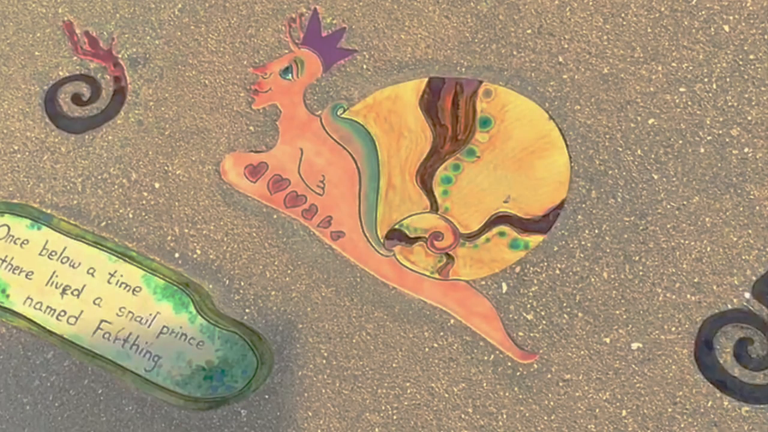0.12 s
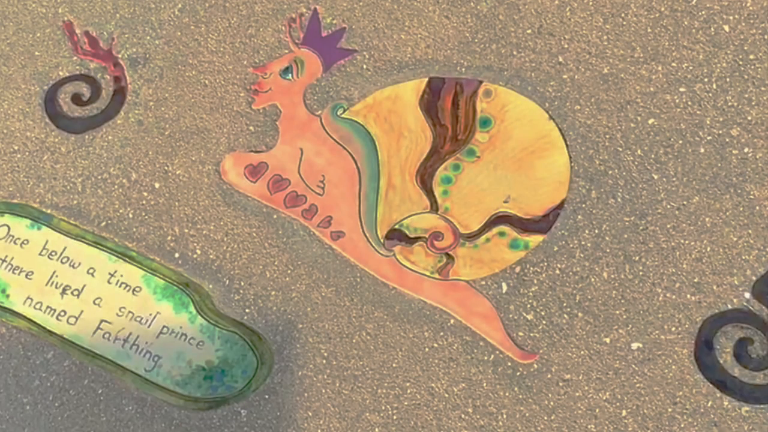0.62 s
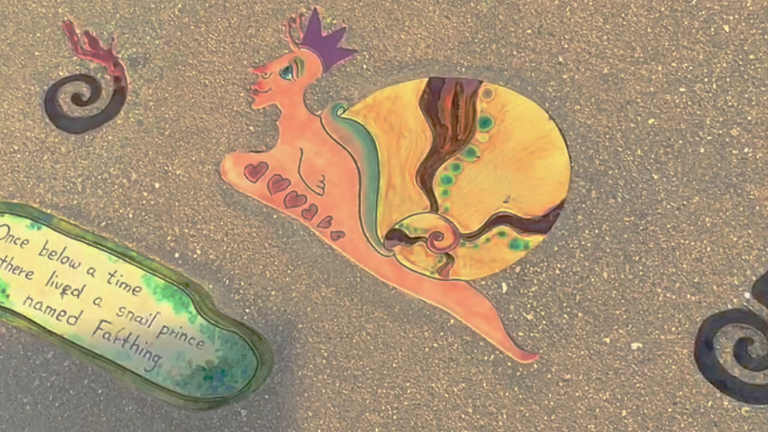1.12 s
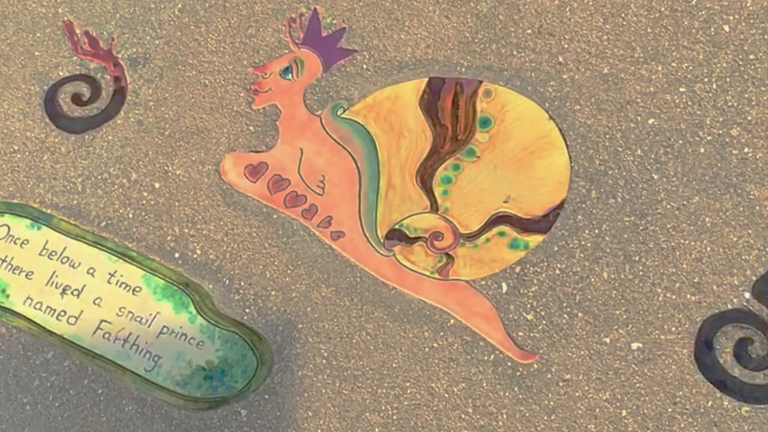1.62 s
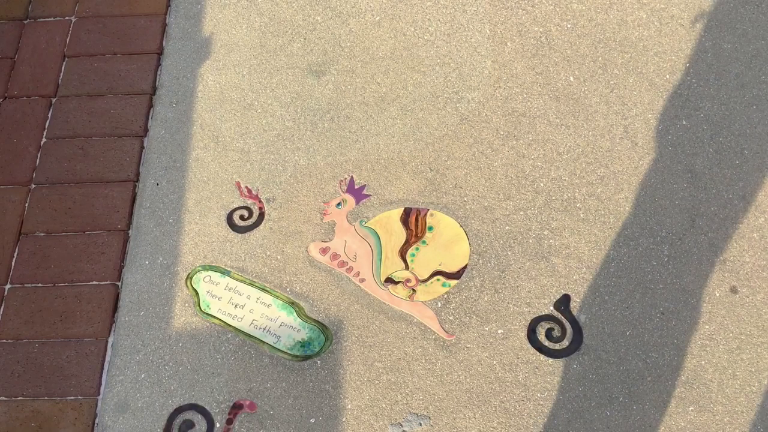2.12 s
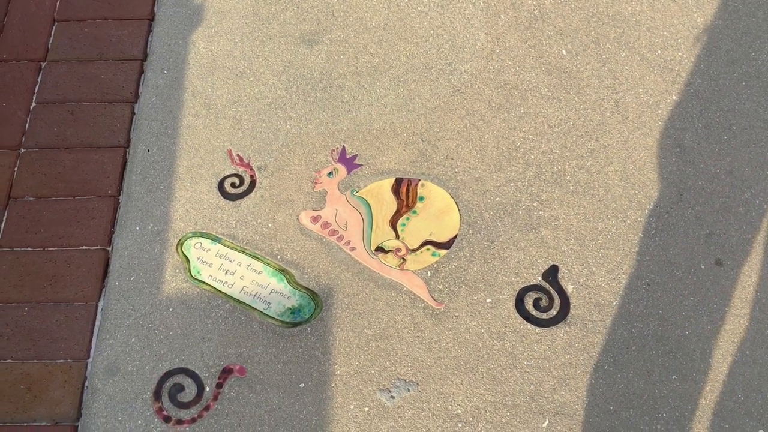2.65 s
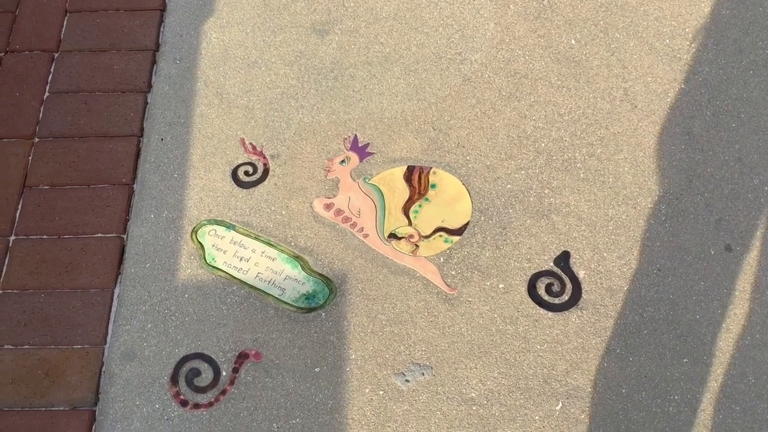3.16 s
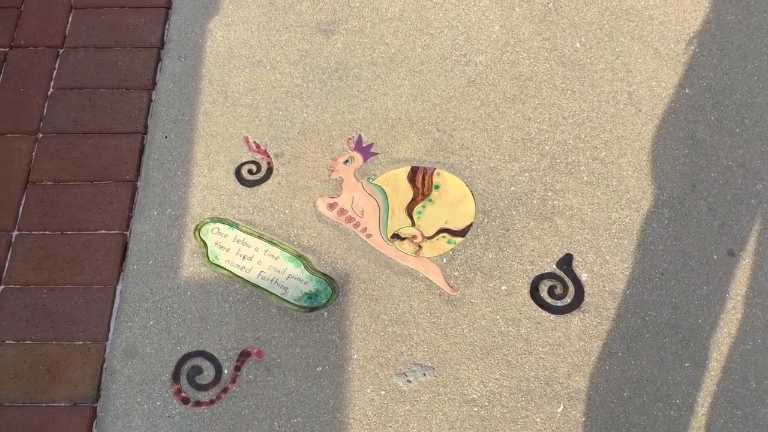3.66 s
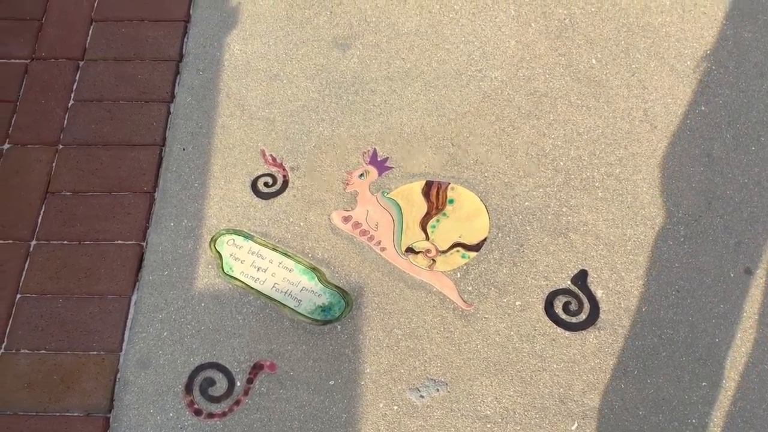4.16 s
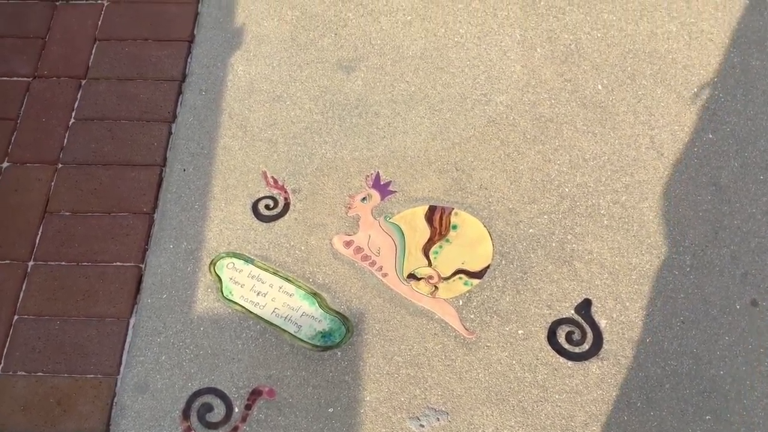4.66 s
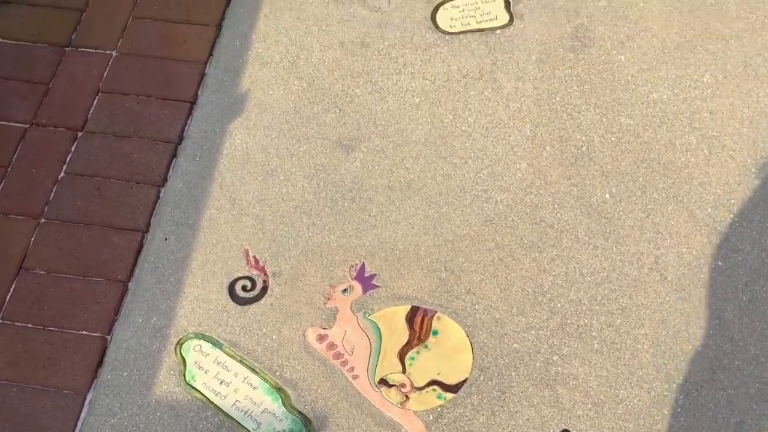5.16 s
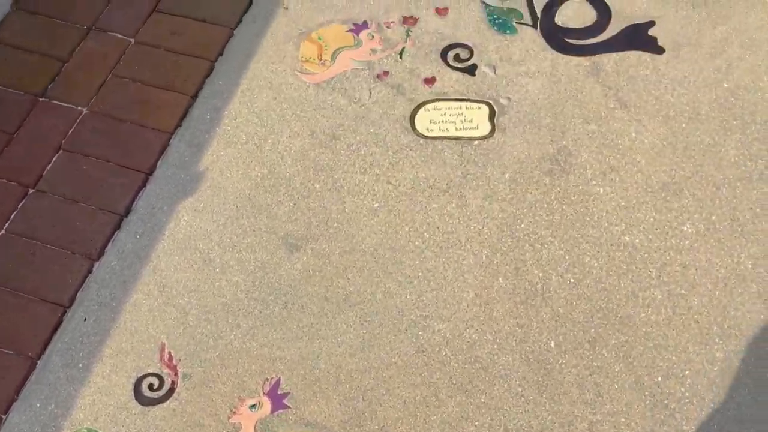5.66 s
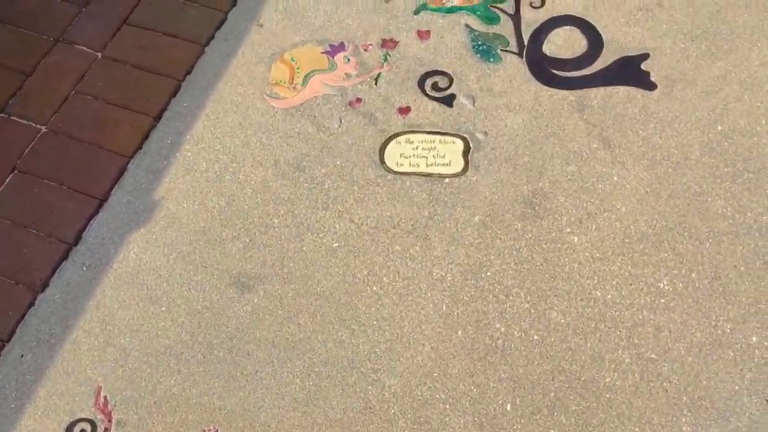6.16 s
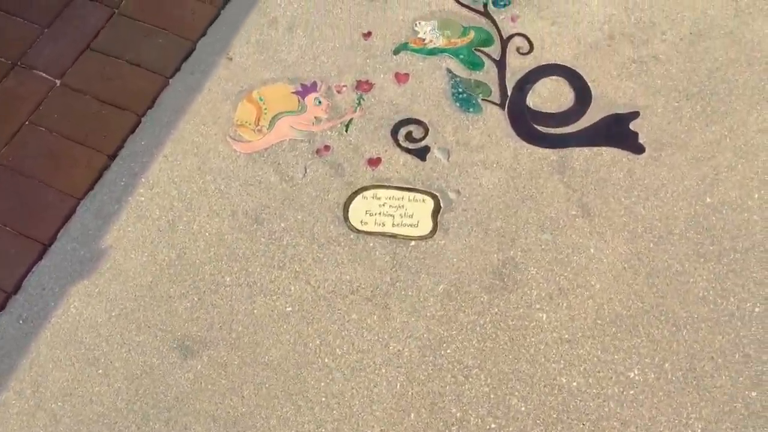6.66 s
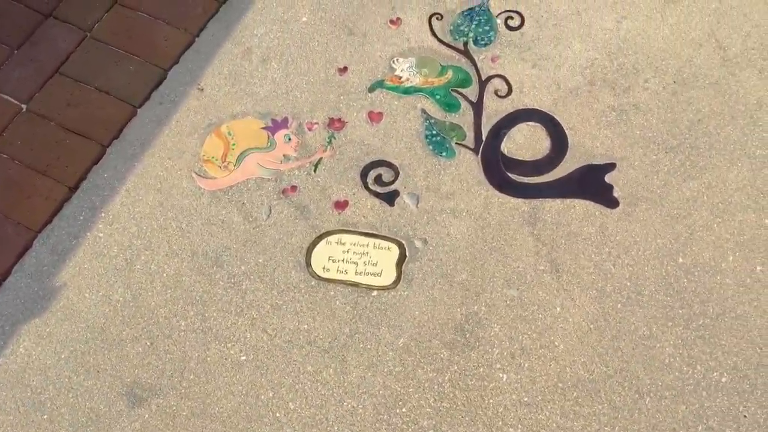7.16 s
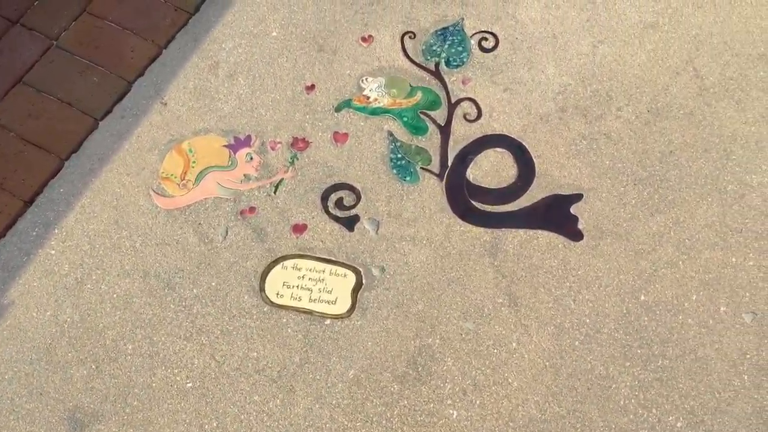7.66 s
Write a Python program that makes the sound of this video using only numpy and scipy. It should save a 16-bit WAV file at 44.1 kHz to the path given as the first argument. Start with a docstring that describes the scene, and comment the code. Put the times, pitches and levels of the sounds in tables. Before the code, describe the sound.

A large fountain, some way off across a paved city square, fills all 7.8 seconds with a dense, even rush: churning midrange water and bright, hissing spray full of tiny drops and bubbles. Pavement echo gives it a slightly hollow colour that shifts as the handheld microphone moves. Distant traffic rumbles softly underneath, wavering. A clear splash lands at 0.9, with gurgling plops around 0.5 to 1.2, and a soft low bump at 1.4. More bubbling comes near 1.9. At about 2.07 the sound fades very quickly to complete silence, then snaps back at 2.23. Dull handling knocks follow at 2.5 and 2.75 amid small splashes. Between 4.1 and 4.26 there are sharp, dry-edged slaps, splashes and two small knocks. The flow continues steadily, with plops around 6 to 6.3 and a busier run of splashes from 6.9 to 7.5, running on to the end.

```python
"""A dense, steady rush of falling water: a large fountain some way off across a paved square.
Banded noise, drop ticks and bubble rings form the rush; noise bursts, slaps and plops stand out on top.
The pavement's echo combs the rush, shifting as the microphone moves; soft knocks are decaying low sines.
City traffic, low filtered noise, rumbles below. The sound fades to silence once and snaps back."""
import sys
import numpy as np
from scipy import signal
from scipy.fft import rfft, irfft
from scipy.io import wavfile
from scipy.ndimage import uniform_filter1d, map_coordinates

SR = 44100
rng = np.random.default_rng(int(sys.argv[2]) if len(sys.argv) > 2 else 0)


def unload_audio(sound):
    """Save the sound as a 16-bit wav file, at the path given as the first command line argument."""
    columns = np.transpose(np.atleast_2d(sound))
    # keep every value between -1 and 1, then stretch to whole-number steps
    steps = np.round(np.clip(columns, -1, 1) * 32767)
    wavfile.write(sys.argv[1], SR, steps.astype(np.int16))


def attenuation_scalar(level_db):
    """Turn a level in dB into a linear amplitude multiplier (20 dB per decade)."""
    decades = np.asarray(level_db, float) / 20
    return 10 ** decades


N = 343539  # samples

# slow drift of the flow, before surges: t/s, churn base level/dB, spray base level/dB
FLOW_DRIFT = [(0, -44.5, -43.5), (.5, -45.5, -42.5), (.9, -42, -43), (1.25, -45, -44), (1.5, -44.5, -43),
              (1.9, -44.5, -43.2), (2.3, -44.5, -43.8), (2.8, -43.5, -44.5), (3.3, -44, -44),
              (3.7, -43, -45), (4.2, -44, -43.5), (4.7, -46.5, -44.5), (5.5, -44, -43.5), (6.2, -45.5, -44),
              (7.0, -45.5, -43), (7.79, -45, -43.4)]
# churn colour: f/Hz, gain/dB
CHURN_COLOUR = [(150, -31.5), (400, -9.5), (650, 0), (1000, -1.5), (1600, 0.5), (2200, -6), (3500, -14),
                (6000, -31.5)]
# spray colour: f/Hz, gain/dB
SPRAY_COLOUR = [(800, -24), (1600, -10.5), (2500, 1.5), (4300, -3), (6000, -4.5), (9000, -8.5),
                (12000, -14), (15700, -18.5)]
# pavement echo and upper band: t/s, first echo crest f/Hz, bass echo strength/1, upper band f/Hz, its gain/dB
PAVEMENT_COMB = [(0.0, 1290, 0.7, 1920, 3.5), (0.37, 1275, 0.3, 1810, 10), (0.53, 917, 0, 2040, 4.5),
                 (0.93, 1110, 0.1, 1850, -2.5), (1.25, 906, 0.1, 2060, -0.5), (1.45, 1260, 0, 1910, 1.5),
                 (1.9, 1206, 0.3, 1930, 4.5), (2.27, 1060, 0.3, 1940, 3.5), (2.6, 1143, 0.4, 2000, 2.2),
                 (3.5, 1132, 0.45, 2030, 1.5), (4.3, 1155, 0.18, 2000, 1), (5.19, 1194, 0.38, 2070, 3.5),
                 (5.61, 984, 0.56, 1810, 3), (6.0, 930, 0.06, 1840, 2.5), (6.6, 997, 0.9, 2000, 1),
                 (7.0, 970, 0.4, 2050, 4.5), (7.45, 1096, 0.7, 2090, 3.2), (7.79, 1015, 0.6, 2050, 5)]
# loudest splashes: t/s, nominal peak level/dB, centre f/Hz
LOUD_SPLASHES = [(0.465, -30, 4800), (0.918, -22, 1460), (1.871, -29, 2580), (2.394, -32, 5300),
                 (2.546, -28, 2800), (2.747, -28.5, 3400), (2.802, -29, 2800), (3.405, -33, 5200),
                 (3.707, -31, 6170), (4.165, -27, 4960), (4.195, -26, 800), (4.26, -26, 2900),
                 (4.923, -33, 3600), (6.276, -33, 7360), (6.491, -30, 1900), (6.882, -28, 3800),
                 (6.976, -29, 2300), (7.126, -33, 4300), (7.244, -27.5, 2210), (7.315, -25, 3100),
                 (7.492, -27, 3400)]
# sharp flat slaps: t/s, onset level/dB, f/Hz, t60/s
FLAT_SLAPS = [(4.0965, -18, 4500, 0.001), (4.170, -22, 4800, .002), (4.1708, -24, 4200, .002),
              (4.243, -21.5, 1300, 0.0074)]
# loudest large bubbles: t/s, peak level/dB, onset f/Hz
LARGE_BUBBLES = [(0.493, -39, 764), (0.541, -37.5, 850), (0.915, -43, 1260), (0.921, -33.5, 850),
                 (0.989, -36, 1120), (1.07, -40, 940), (1.182, -39, 660), (1.725, -37, 1505),
                 (1.826, -41, 1186), (1.892, -34, 1400), (3.074, -38, 1190), (3.169, -37, 1065),
                 (4.119, -35, 1080), (5.955, -37.5, 798), (6.18, -38, 970), (6.325, -38, 940),
                 (6.898, -37, 936), (7.035, -34, 944), (7.645, -37, 920)]
# gurgle strength over its base level: t/s, level/dB
GURGLE_DRIFT = [(0, 5), (.4, 0.5), (.6, -6), (.93, 2), (1.0, 4), (1.2, 0), (1.7, 0.5), (1.9, 6.5),
                (2.3, -1.5), (4.3, 0.5), (4.8, -1), (6.0, -1), (6.3, 0.5), (7.79, -1)]
# knocks on the microphone body: t/s, onset level/dB, f/Hz, t60/s
BODY_KNOCKS = [(1.374, -24.5, 110, 0.047), (2.484, -26, 70, 0.075), (2.745, -27.5, 75, 0.091),
               (2.772, -27.5, 93, 0.18), (4.196, -30, 278, 0.038), (4.2475, -24.5, 224, 0.017)]
# engine swell, before the random wavering: t/s, level/dB
ENGINE_SWELL = [(0, -44.5), (.35, -47.5), (.62, -43), (1.0, -45), (2.0, -47), (2.35, -43.5), (2.75, -44.5),
                (3.05, -46.5), (3.6, -44.5), (4.6, -43.5), (5.3, -44.5), (5.55, -46), (5.8, -43.5),
                (6.1, -45), (6.55, -42.5), (7.3, -44.5), (7.79, -42)]
# engine colour: f/Hz, gain/dB
ENGINE_COLOUR = [(20, -48), (30, -31), (40, -15), (58, 3), (72, 0), (100, -8.5), (130, -8.5), (200, -34.5),
                 (400, -75.5)]
# tyre colour: f/Hz, gain/dB
TYRE_COLOUR = [(60, -34), (110, -6), (140, -2.5), (220, -5.5), (320, -6.5), (450, -14), (700, -20),
               (1500, -64)]
# microphone housing dips: centre f/Hz, Gaussian width/Hz, gain/dB
HOUSING_DIPS = [(2900, 250, -2.5), (4890, 140, -3), (7700, 430, -2.5), (10400, 310, -4)]
# fade to silence and return: t/s, gain/dB
MUTE_GAIN = [(2.055, 0), (2.062, -6), (2.068, -22), (2.076, -45), (2.093, -56), (2.095, -120),
             (2.2335, -120), (2.2345, 0)]


def fountain():
    """Jets churn the pool into bubbles and break into spray; both surge together, each heaves alone."""
    heave_db, heave_knots_per_s = -0.11, 6.3
    churn_db, spray_db = curves(FLOW_DRIFT, np.arange(N) / SR)
    surge = wobble(12) + 0.98 * wobble(25)
    churn_db = churn_db + heave_db * wobble(heave_knots_per_s) + 0.56 * surge
    spray_db = spray_db + heave_db * wobble(heave_knots_per_s) + 0.3 * surge
    landing = sheets(count=70, spread_db=3.5, life_s=0.012)
    rush = attenuation_scalar(churn_db) * churn() + attenuation_scalar(spray_db) * landing * spray()
    large_bubbles = np.vstack([LARGE_BUBBLES, gurgle(count=500)])
    return rush + splashes(count=40) + plops(large_bubbles, life_s=0.0038)


def churn():
    """Churned pool: patchy noise plus bubbles, coloured and combed, rms 1."""
    x = patchy(depth_db=2.3)
    x = x + attenuation_scalar(-10.5) * bubbles(count=9000, mid_hz=1400, octaves=0.692, cycles=7.1, spread_db=1.5)
    return unit(shaped(x, lambda hz, t: attenuation_scalar(along(CHURN_COLOUR, hz)) * pavement(hz, t)))


def spray():
    """Falling spray: patchy noise, drop ticks and small bubbles, coloured and combed, rms 1."""
    x = patchy(depth_db=2.0)
    x = x + attenuation_scalar(-3) * drops(count=5000, spread_db=3.0, life_s=0.0021)
    x = x + attenuation_scalar(-10.5) * bubbles(count=5000, mid_hz=5503, octaves=0.8, cycles=47, spread_db=1.6)
    return unit(shaped(x, lambda hz, t: attenuation_scalar(along(SPRAY_COLOUR, hz)) * pavement(hz, t)))


def sheets(count, spread_db, life_s):
    """Spray gain: sheets of water land at random, each a quick broad rise that fades."""
    s, size = rng.random((count, 2)).T
    age = np.arange(4096) / SR / life_s
    swell = (1 - np.exp(-6 * age)) * np.exp(-age)
    rise_db = spread_db * (0.5 + size[:, None]) * swell
    return attenuation_scalar(scatter(s * N / SR, rise_db))


def drops(count, spread_db, life_s):
    """Drop impacts: broad noise ticks with a sharp start, some larger than the rest, rms 1."""
    s, size = rng.random((count, 2)).T
    t = np.arange(256) / SR
    tick = rng.standard_normal((count, len(t))) * np.exp(-t / life_s)
    level_db = -spread_db * np.log(1.004 - size)
    return unit(scatter(s * N / SR, tick * attenuation_scalar(level_db)[:, None]))


def bubbles(count, mid_hz, octaves, cycles, spread_db):
    """Trapped air rings briefly, its pitch rising as it nears the surface; rms 1."""
    s, size = rng.random((count, 2)).T[..., None]
    hz = np.clip(mid_hz * 2 ** (octaves * rng.standard_normal((count, 1))), 400, 14000)
    turns = hz * np.arange(900) / SR
    envelope = np.exp(-3 * turns / cycles) * (1 - np.exp(-turns))
    ring = np.sin(2 * np.pi * turns * (1 + 0.095 * turns / cycles)) * envelope
    level_db = -spread_db * np.log(1 - size)
    return unit(scatter(s[:, 0] * N / SR, ring * attenuation_scalar(level_db)))


def splashes(count):
    """Loud splashes, random smaller ones (the higher, the weaker) as noise bursts; slaps as short rings."""
    base_db, db_per_oct, size_db, base_hz = -37, -7, 1.5, 6500
    s = rng.random(count) * N / SR
    size, pitch = rng.standard_normal((count, 2)).T
    octave = np.clip(0.6 * pitch, -1.5, 0.9)
    small = np.c_[s, base_db + db_per_oct * octave + size_db * size, base_hz * 2 ** octave]
    wet = bursts(np.vstack([LOUD_SPLASHES, small]), octaves=0.35, t60_s=0.048, attack_s=0.0021)
    return wet + rings(FLAT_SLAPS)


def plops(rows, life_s):
    """A large bubble swells, rings and dies, rising a little in pitch."""
    s, db, hz = np.transpose(rows)[..., None]
    age = np.arange(2048) / SR / life_s
    envelope = age * np.exp(1 - age)
    ring = np.sin(2 * np.pi * hz * life_s * age * (1 + 0.0044 * age))
    return scatter(s[:, 0], attenuation_scalar(db) * envelope * ring)


def gurgle(count):
    """Rows (t/s, peak level/dB, f/Hz) of smaller bubbles, in bunches, pitched around the first crest."""
    base_db, spread_db, spread_oct = -47.5, 2, 0.1276
    clump_db, clump_knots_per_s = 1.5, 7
    s = rng.random(count) * N / SR
    size, pitch = rng.standard_normal((count, 2)).T
    clump = wobble(clump_knots_per_s)[(s * SR).astype(int)]
    db = base_db + curves(GURGLE_DRIFT, s)[0] + clump_db * clump + spread_db * size
    return np.c_[s, db, curves(PAVEMENT_COMB, s)[0] * 2 ** (spread_oct * pitch)]


def pavement(hz, t):
    """Gain of direct sound plus ground echo, weaker in the treble; an upper band swells and drifts alone."""
    crest_hz, strength, upper_hz, upper_db = curves(PAVEMENT_COMB, t)
    echo = np.clip(strength, 0, 1) / (1 + (hz / 1500) ** 2)
    upper = attenuation_scalar(upper_db * np.exp(-0.5 * ((hz - upper_hz) / 200) ** 2))
    return upper * np.abs(1 + echo * np.exp(-2j * np.pi * hz / crest_hz))  # delay = 1 / crest_hz


def knocks():
    """Soft bumps on the microphone body: low swings that die fast."""
    return rings(BODY_KNOCKS)


def traffic():
    """Distant engines, a low rumble that swells and wavers irregularly, over a steady roar of tyres."""
    tyres_db, waver_db, waver_knots_per_s = -48.5, 0.7, 5.3
    engines = unit(shaped(rng.standard_normal(N), lambda hz, t: attenuation_scalar(along(ENGINE_COLOUR, hz))))
    tyres = unit(shaped(patchy(depth_db=1.24), lambda hz, t: attenuation_scalar(along(TYRE_COLOUR, hz))))
    engines_db = curves(ENGINE_SWELL, np.arange(N) / SR)[0] + waver_db * wobble(waver_knots_per_s)
    return attenuation_scalar(engines_db) * engines + attenuation_scalar(tyres_db) * tyres


def bursts(rows, octaves, t60_s, attack_s):
    """Sudden decaying bursts of noise, each in a broad band, Gaussian in octaves."""
    s, db, hz = np.transpose(rows)[..., None]
    t = np.arange(2048) / SR
    f = np.fft.rfftfreq(2048, 1 / SR) + 1
    spectrum = rfft(rng.standard_normal((len(s), len(t))))
    band = irfft(spectrum * np.exp(-0.5 * (np.log2(f / hz) / octaves) ** 2))
    band /= 2 * band.std(axis=1, keepdims=True)  # rms 0.5
    return scatter(s[:, 0], band * attenuation_scalar(db - 60 * t / t60_s) * (1 - np.exp(-t / attack_s)))


def rings(rows):
    """Blows: sines that start at once and decay exponentially."""
    s, db, hz, t60_s = np.transpose(rows)[..., None]
    t = np.arange(4096) / SR
    return scatter(s[:, 0], attenuation_scalar(db - 60 * t / t60_s) * np.sin(2 * np.pi * hz * t))


def patchy(depth_db):
    """Noise with random louder and softer patches, some 600 Hz by 30 ms."""
    z = signal.stft(rng.standard_normal(N), nperseg=256)[2]
    field = uniform_filter1d(rng.standard_normal(z.shape), size=4, axis=0)
    field = uniform_filter1d(field, size=9, axis=1)
    return signal.istft(z * attenuation_scalar(depth_db * unit(field)), nperseg=256)[1][:N]


def shaped(x, gain):
    """x times a gain of frequency and time."""
    hz, t, z = signal.stft(x, SR, nperseg=4096, noverlap=3072)
    return signal.istft(z * gain(hz[:, None], t), SR, nperseg=4096, noverlap=3072)[1][:N]


def scatter(s, rows):
    """Short sounds, one a row, added at their times s."""
    at = (s * SR).astype(int)[:, None] + np.arange(rows.shape[1])
    return np.bincount(at.ravel(), rows.ravel(), N + SR)[:N]


def wobble(knots_per_s):
    """Smooth random curve through normal knots."""
    return map_coordinates(rng.standard_normal(N // 100), [np.arange(N) * knots_per_s / SR])


def curves(rows, t):
    """Each column after the time, read at times t."""
    s, *cols = np.transpose(rows)
    return [np.interp(t, s, c) for c in cols]


def along(points, hz):
    """(f/Hz, value) points read on a log axis."""
    f, v = np.transpose(points)
    return np.interp(np.log(hz + 1), np.log(f + 1), v)


def unit(x):
    """x brought to rms 1."""
    return x / np.sqrt(np.mean(x ** 2) + 1e-20)


def scene():
    """Water, city and handling, in one channel."""
    return (fountain() + traffic() + knocks())[None]


def top_cut(x):
    """Nothing passes above the cut-off."""
    return signal.sosfilt(signal.butter(12, 15830, fs=SR, output="sos"), x)


def record(dry):
    """The housing dips a few bands, the top is cut; the sound fades to silence once and snaps back."""
    top_hz = 15720

    def housing(hz, t):
        """Gain of the dips, zero from top_hz up."""
        dips_db = sum(db * np.exp(-0.5 * ((hz - c) / w) ** 2) for c, w, db in HOUSING_DIPS)
        return (hz < top_hz) * attenuation_scalar(dips_db)

    mute_db = curves(MUTE_GAIN, np.arange(N) / SR)[0]
    mix = shaped(dry[0], housing) * attenuation_scalar(mute_db)
    return top_cut(mix[None])


dry = scene()
out = record(dry)
unload_audio(out)
```